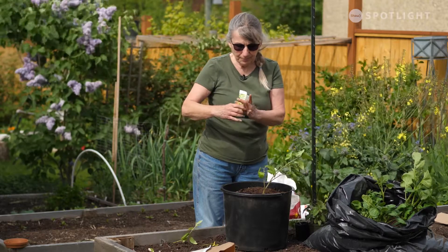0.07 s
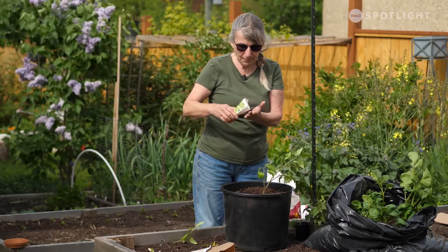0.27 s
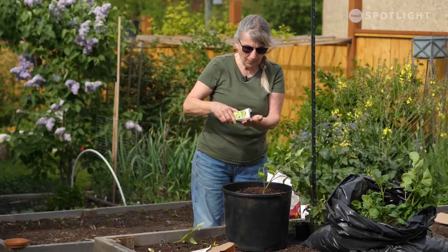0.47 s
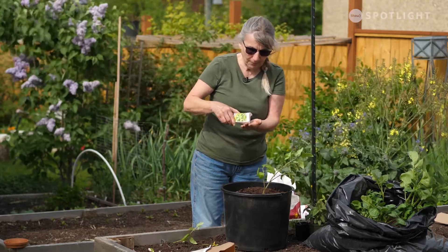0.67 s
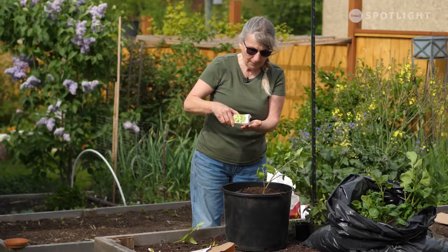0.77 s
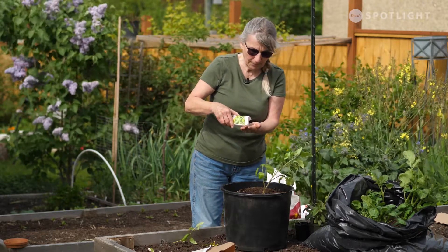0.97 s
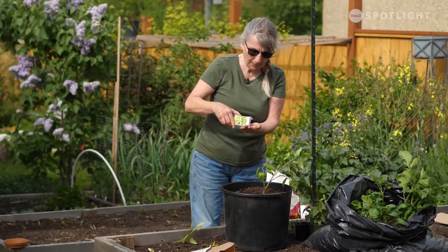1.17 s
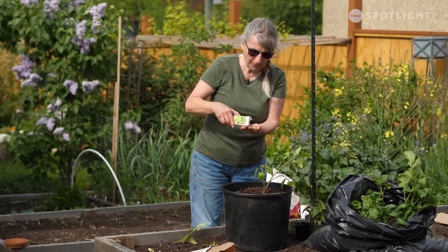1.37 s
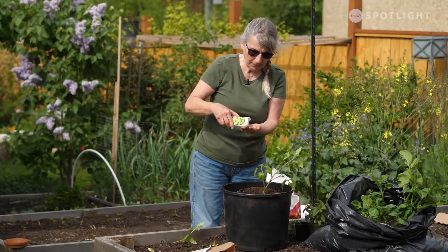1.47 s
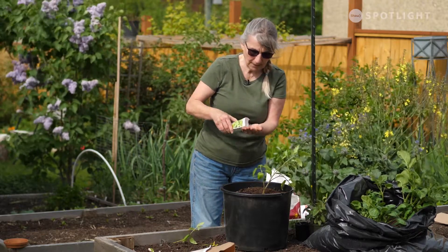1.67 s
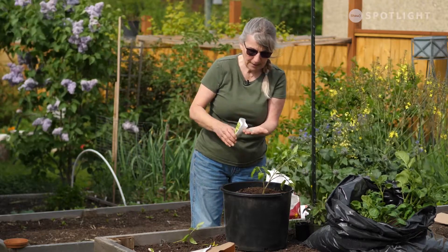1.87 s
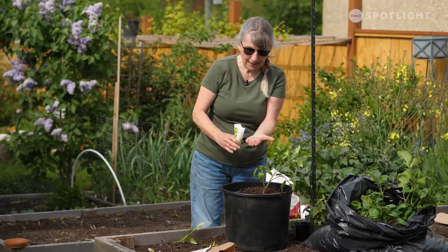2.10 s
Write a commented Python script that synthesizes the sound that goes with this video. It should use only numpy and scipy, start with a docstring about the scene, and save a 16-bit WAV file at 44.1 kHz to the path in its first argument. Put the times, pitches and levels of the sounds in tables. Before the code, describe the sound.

A small paper seed packet rustles in a quiet garden: low bumps on a clip-on microphone come first, then uneven dry rustling with sharp crinkles, a near pause, and a last brief rustle as it lifts away.

```python
"""Seed packet tipped over a palm

A paper seed packet is tipped, jiggled over a palm and lifted away, in a quiet garden.
Paper and seeds slide in a dense stream of tiny random clicks, with a few sharper crinkle bursts.
The moving arms shake a clip-on microphone on the shirt: filtered noise rumbles, short sine
swells bump and cloth noise scuffs. Faint steady noise is the still garden air."""
import sys
import numpy as np
from scipy import signal
from scipy.fft import rfft, irfft
from scipy.io import wavfile

SR = 44100
rng = np.random.default_rng(int(sys.argv[2]) if len(sys.argv) > 2 else 0)


def inscribe(sig):
    """Save sig as 16-bit PCM at rate SR to the path in sys.argv[1].

    A 1-D sig is mono; a 2-D sig holds one channel per row.
    Samples are clipped to [-1, 1] before scaling.
    """
    pcm = np.round(np.clip(np.atleast_2d(sig).T, -1, 1) * 32767)
    wavfile.write(sys.argv[1], SR, pcm.astype(np.int16))


N = 94329  # length in samples
TIME = np.arange(N) / SR  # seconds
HZ = np.fft.rfftfreq(N, 1 / SR)

# Sliding of paper and seeds; the treble is set against the level, before TREBLE_DB is added:
# (time [s], level [dB], treble [dB])
SLIDING = [(0.0, -57.5, -5.5), (0.05, -69, -10), (0.12, -60.5, -4.5), (0.21, -70.5, -9.5), (0.37, -43, -12),
           (0.42, -49.5, -11), (0.45, -50, -11.5), (0.46, -54.5, -18), (0.53, -47.5, -12),
           (0.65, -53.5, -12.5), (0.73, -50.5, -11), (0.76, -57.5, -10.5), (0.84, -50, -10),
           (0.88, -51.5, -10), (0.9, -45.5, -10), (0.94, -54.5, -8), (0.96, -49.5, -11), (1.0, -42, -10),
           (1.03, -46.5, -10.5), (1.07, -45.5, -5.5), (1.12, -51.5, -11.5), (1.17, -47, -7),
           (1.2, -50.5, -8.5), (1.23, -52, -2.5), (1.27, -56, -7), (1.29, -51, -9), (1.37, -52, -5.5),
           (1.4, -60, -5.5), (1.45, -48.5, -6.5), (1.48, -55.5, -13), (1.5, -49, -6.5), (1.55, -58.5, -7.5),
           (1.59, -54, -9.5), (1.65, -72, -10.5), (1.76, -76.5, -6.5), (1.8, -62, -15.5), (1.84, -65, -12),
           (1.9, -52, -15.5), (1.94, -50, -19.5), (2.0, -40.5, -11.5), (2.07, -47, -12.5),
           (2.11, -55, -11.5), (2.12, -58, -18), (2.14, -67.5, -13)]
# Colour of the rustle while the packet is turned, poured and lifted away:
# (frequency [Hz], relative density [dB per Hz])
TURN_COLOUR = [(300, -27), (700, -5), (1000, -4), (1700, -1), (2300, -6), (3500, -13), (5000, -14.5),
               (7000, -24), (9000, -20.5), (15500, -29)]
POUR_COLOUR = [(240, -63.5), (400, -21), (481, -13.5), (623, -6), (694, -6.5), (784, -3.5), (942, -7.5),
               (1240, -4), (1360, 0.5), (1930, -5.5), (2550, 0.5), (3060, -2), (3300, -6.5), (3570, -6.5),
               (3910, -15), (4920, -5), (5480, -13), (6680, -16), (7670, -25), (9650, -17), (10600, -23.5),
               (11600, -21), (15500, -24.5)]
LIFT_COLOUR = [(180, -36), (300, -9.5), (417, -10), (509, -9), (756, -4), (1110, -4.5), (1330, -2.5),
               (2690, -1), (3450, -10), (4650, -5), (5760, -16), (7370, -16), (8010, -23), (8990, -15.5),
               (15500, -24.5)]
POUR_FROM_S, POUR_BY_S = 0.318, 0.343  # fade from turning to pouring
LIFT_FROM_S, LIFT_BY_S = 1.52, 1.91  # fade from pouring to lifting
SLIPS_PER_S, SLIP_SPREAD_DB = 9000, 3.5  # average rate before clumping, and unevenness of size
CLUMP_DB, CLUMP_HZ = 1.37, 115  # typical swing of the clumps, and how fast they come and go
TREBLE_DB, TREBLE_HZ = -2.5, 6500  # treble trim, and where the treble begins

# Stirring of the shirt at the microphone, before RUMBLE_DB is added: (time [s], level [dB])
STIRRING = [(0.0, -41), (0.12, -42), (0.14, -39.5), (0.33, -39.5), (0.34, -33.5), (0.42, -46), (0.52, -39),
            (0.56, -47), (0.71, -39.5), (0.76, -54), (0.93, -43), (0.97, -65), (1.02, -48), (1.04, -58),
            (1.38, -53.5), (1.4, -50.5), (1.59, -60), (1.73, -51.5), (1.8, -58), (2.14, -53.5)]
# Colour of the handling rumble, then of the deep outdoor rumble:
# (frequency [Hz], relative density [dB per Hz])
RUMBLE_COLOUR = [(20, -24.5), (45, -1.5), (80, 4), (140, -8.5), (190, -9.5), (280, -25), (400, -32),
                 (800, -61.5), (2500, -120)]
DEEP_COLOUR = [(10, -35.5), (22, -8), (40, 6), (60, -11), (100, -18), (250, -52.5), (1200, -120)]
RUMBLE_DB = -1.5
DEEP_DB, DEEP_FOLLOW = -48.5, 0.32  # average level in dB, and share of the stirring's swings

# Colour of the still garden air: (frequency [Hz], relative density [dB per Hz])
AIR_COLOUR = [(150, -53), (250, -2.5), (302, -2.5), (371, 3), (687, -1), (723, -0.5), (1070, -7),
              (1150, -6.5), (15000, -86.5)]
AIR_DB = -67.5

# Soft bumps on the microphone, each with a scuff set against the bump:
# (time [s], peak of the swell [dB], pitch [Hz], scuff [dB])
SOFT_BUMPS = [(0.005, -31, 67.6, -22.5), (0.072, -35, 105, -9), (0.142, -33.5, 123, -8),
              (0.17, -32, 100, -44), (0.198, -42, 137, -12.5), (0.223, -31.5, 99.5, -16),
              (0.257, -43.5, 145, -7.5), (0.283, -31, 84, -28), (0.326, -33, 120, -16),
              (0.347, -30, 79, -28.5), (0.395, -36, 64, -15.5), (0.508, -32, 75, -21),
              (0.613, -36.5, 114, -21), (0.829, -33.5, 49.3, -35), (0.872, -35.5, 45.7, -41),
              (0.913, -33.5, 43, -45.5), (1.003, -38.5, 130.4, -20), (1.4, -42, 75, -24),
              (1.696, -34, 64, -41), (1.756, -35.5, 56, -54)]
# Colour of cloth scuffing: (frequency [Hz], relative density [dB per Hz])
SCUFF_COLOUR = [(100, -1.5), (200, 8.5), (320, 3.5), (550, -7), (900, -22), (2000, -68), (5000, -100)]
BUMP_RISE_S, SCUFF_RISE_S = 0.0085, 0.013

# Crinkles of the paper, before CRINKLE_DB is added:
# (time [s], level [dB], centre frequency [Hz], decay [s])
PAPER_CRINKLES = [(0.0723, -37.5, 3500, 0.00061), (0.2622, -40.5, 1990, 0.0014), (0.3128, -38, 3800, 0.001),
                  (0.359, -37.5, 6000, 0.0017), (0.396, -33.5, 2180, 0.0049), (0.996, -33, 4500, .002),
                  (1.016, -34, 3500, 0.0018), (1.156, -42.5, 4500, 0.0038), (1.452, -34.5, 3000, 0.0026),
                  (1.4687, -42, 5500, .0013), (1.739, -63, 7000, .001), (1.767, -57.5, 6960, .001),
                  (1.7975, -50, 3470, 0.00086), (1.969, -30.5, 3500, 0.00066), (2.0675, -36, 5860, 0.00085),
                  (2.121, -30.5, 1670, 0.0012)]
CRINKLE_OCTAVES, CRINKLE_DB = 0.86, -6.5  # spread of pitch in octaves, and level trim

EDGE_HZ = 15780  # upper limit of the sound


def amp(db):
    """Turns decibels into gain."""
    return 10 ** (np.asarray(db) / 20)


def unit(x):
    """Scales a signal to an rms (average strength) of 1."""
    return x / np.sqrt(np.mean(x ** 2) + 1e-20)


def add(mix, start_s, sound):
    """Mixes a sound in at a given time."""
    part = mix[max(round(start_s * SR), 0):][:len(sound)]
    part += sound[:len(part)]


def colour(x, points):
    """Filters to a given spectrum, so that each click rings only after it lands."""
    point_hz, point_db = np.transpose(points)
    all_hz = abs(np.fft.fftfreq(N, 1 / SR))
    gain_db = np.interp(np.log(all_hz + 1), np.log(point_hz + 1), point_db)
    # The Hilbert transform of the log gain gives the phase that avoids ringing ahead of a click.
    log_gain = np.log(amp(gain_db))
    response = np.exp(np.conj(signal.hilbert(log_gain)))[:len(HZ)]
    return unit(irfft(rfft(x) * response, N))


def noise(points):
    """Makes steady noise of a given spectrum."""
    return colour(rng.standard_normal(N), points)


def swell(u):
    """Rises smoothly to 1 at u = 1, then dies away."""
    return (u * np.exp(1 - u)) ** 2


def rustle():
    """Tiny slips of uneven size come in clumps and ring the packet, whose colour changes with the grip."""
    s, level_db, treble_db = np.transpose(SLIDING)
    sizes_db = SLIP_SPREAD_DB * np.minimum(rng.exponential(1, N), 4)
    sizes = amp(sizes_db) * rng.choice([-1, 1], N)
    lands = rng.random(N) < SLIPS_PER_S / SR
    # Slow noise makes the slips stronger and weaker in turn.
    clumps = unit(irfft(rfft(rng.standard_normal(N)) / (1 + (HZ / CLUMP_HZ) ** 4), N))
    slips = sizes * lands * amp(CLUMP_DB * clumps)

    tipped = np.interp(TIME, [POUR_FROM_S, POUR_BY_S], [0, 1])
    lifted = np.interp(TIME, [LIFT_FROM_S, LIFT_BY_S], [0, 1])
    turning = (1 - tipped) * colour(slips, TURN_COLOUR)
    pouring = (tipped - lifted) * colour(slips, POUR_COLOUR)
    lifting = lifted * colour(slips, LIFT_COLOUR)
    paper = turning + pouring + lifting

    # Body and treble are split so that their balance can change from moment to moment.
    body = irfft(rfft(paper) / (1 + (HZ / TREBLE_HZ) ** 10), N)
    treble = unit(paper - body) * amp(TREBLE_DB + np.interp(TIME, s, treble_db))
    return (unit(body) + treble) * amp(np.interp(TIME, s, level_db))


def rumble():
    """Handling noise follows the stirring of the shirt; the deep outdoor rumble swells less."""
    stir_db = np.interp(TIME, *np.transpose(STIRRING))
    deep_db = DEEP_DB + DEEP_FOLLOW * (stir_db - stir_db.mean())
    handling = noise(RUMBLE_COLOUR) * amp(RUMBLE_DB + stir_db)
    deep = noise(DEEP_COLOUR) * amp(deep_db)
    return handling + deep


def garden_air():
    """Still air is a faint, steady noise with little treble."""
    return amp(AIR_DB) * noise(AIR_COLOUR)


def bumps():
    """Each tug rocks the microphone for a cycle or two and scuffs cloth across it."""
    rocking, scuffing = np.zeros(N), np.zeros(N)
    t = TIME[:SR // 8]
    for s, db, pitch_hz, scuff_db in SOFT_BUMPS:
        wave = np.sin(2 * np.pi * (pitch_hz * t + rng.random()))  # starts anywhere in its cycle
        add(rocking, s, amp(db) * swell(t / BUMP_RISE_S) * wave)
        add(scuffing, s, amp(db + scuff_db) * swell(t / SCUFF_RISE_S))
    return rocking + scuffing * noise(SCUFF_COLOUR)


def crinkles():
    """A crease gives way in a burst of random snaps, a few milliseconds long."""
    out, t = np.zeros(N), TIME[:1024]
    hz = np.fft.rfftfreq(2 * len(t), 1 / SR)
    for s, db, centre_hz, decay_s in PAPER_CRINKLES:
        octaves_away = np.log2((hz + 1) / centre_hz)
        hump = np.exp(-.5 * (octaves_away / CRINKLE_OCTAVES) ** 2)
        band = hump / np.sqrt(1 + hz / centre_hz)
        snaps = rng.choice([-1, 1], len(t)) * np.exp(-t / decay_s)
        # Silence ahead of the snaps leaves room for the filter; the start is moved back to match.
        padded = np.pad(snaps, (len(t), 0))
        burst = irfft(rfft(padded) * unit(band))
        add(out, s - len(t) / SR, amp(db + CRINKLE_DB) * burst)
    return out


def scene():
    """Everything is close and dry, in the open air, so the layers add with no echo."""
    return (rustle() + rumble() + garden_air() + bumps() + crinkles())[None]


def record(dry):
    """A steep low-pass filter sets the recorder's band limit."""
    low_pass = signal.firwin(511, EDGE_HZ, window=("kaiser", 9), fs=SR)
    return signal.oaconvolve(dry, low_pass[None], "same")


dry = scene()
out = record(dry)
inscribe(out)
```